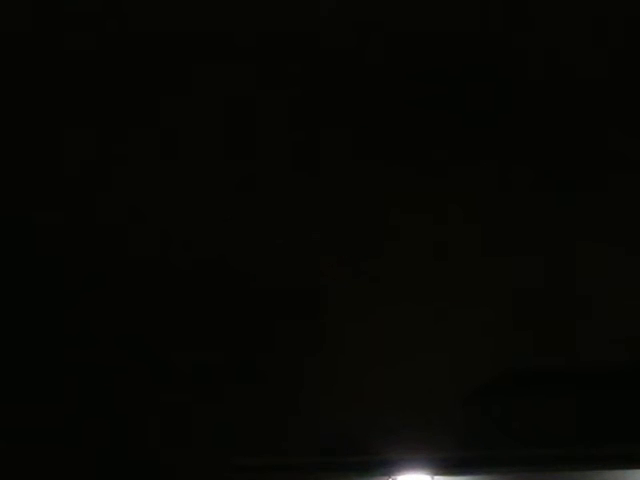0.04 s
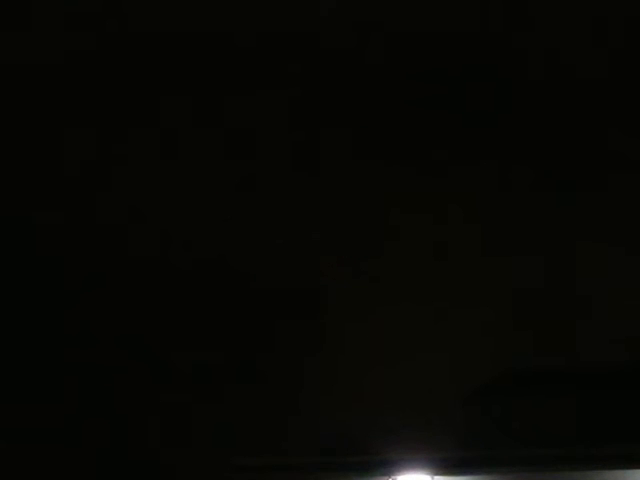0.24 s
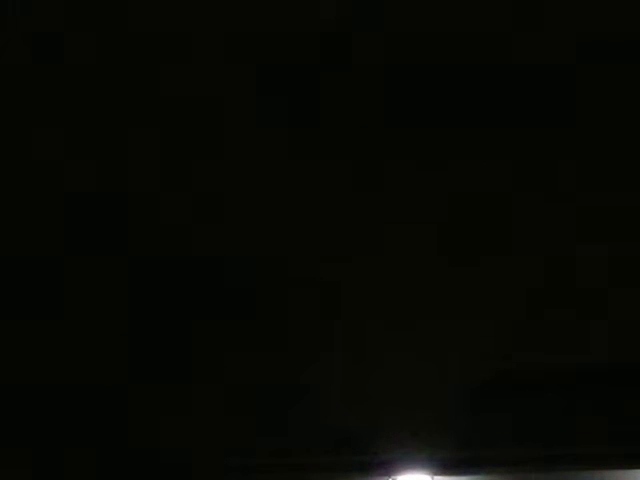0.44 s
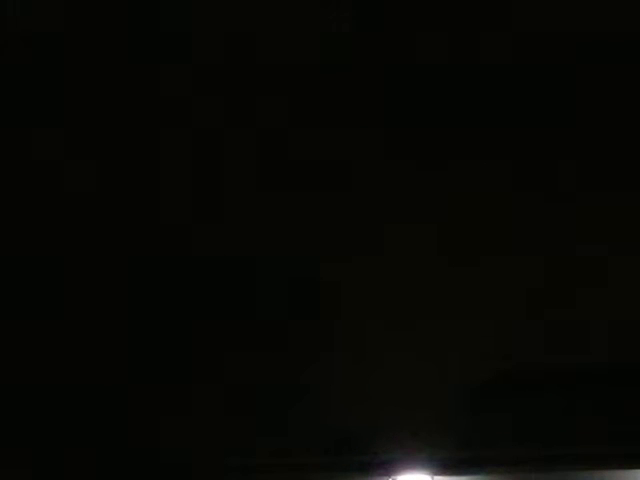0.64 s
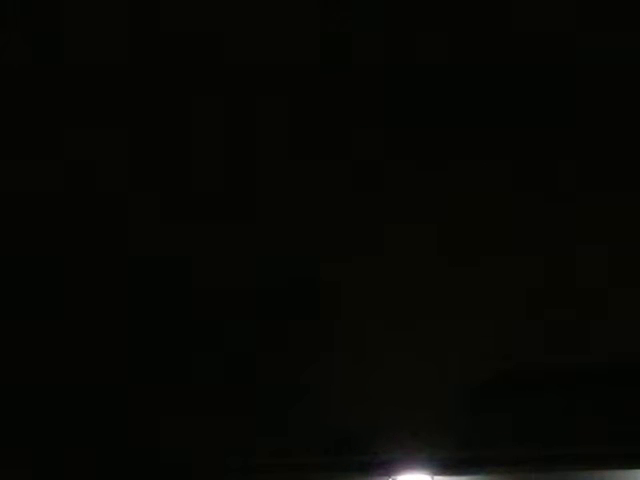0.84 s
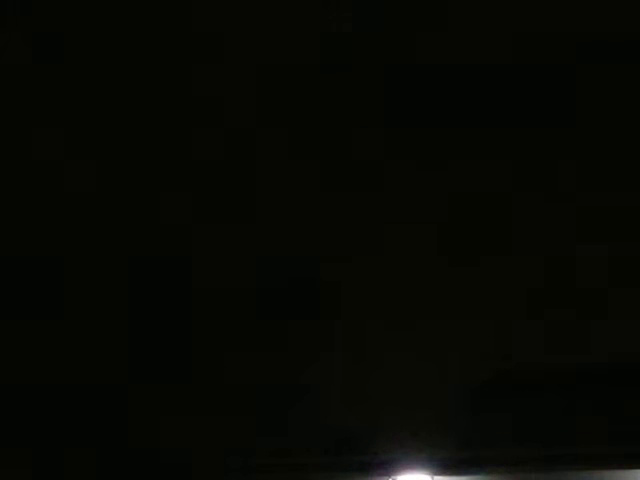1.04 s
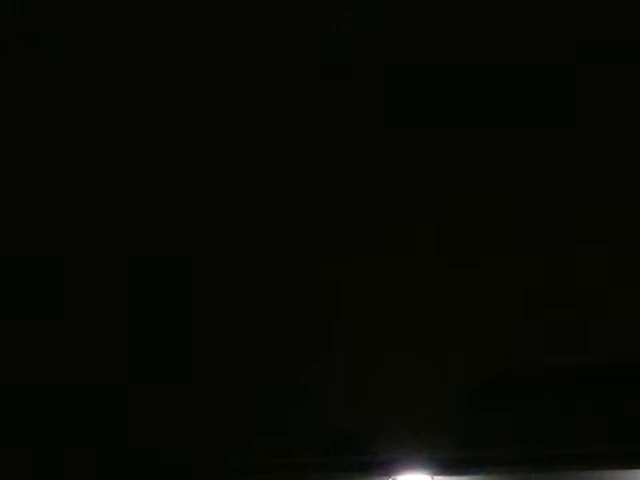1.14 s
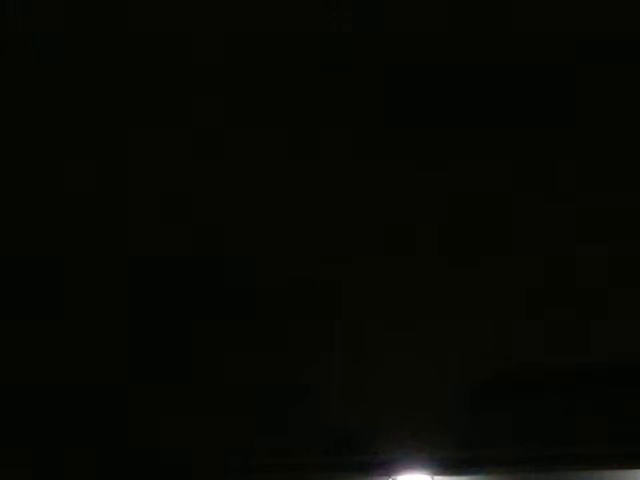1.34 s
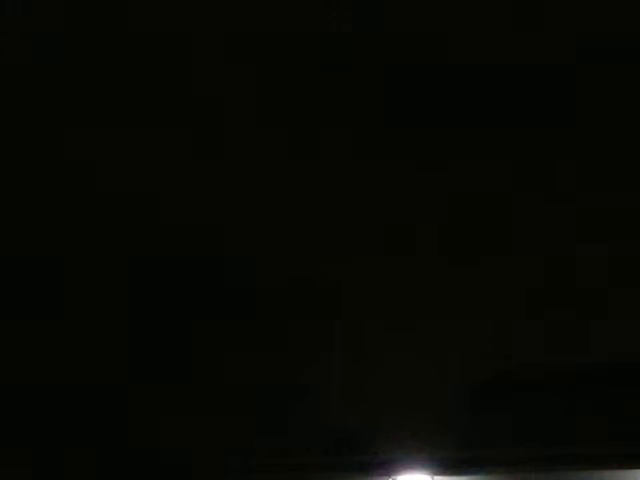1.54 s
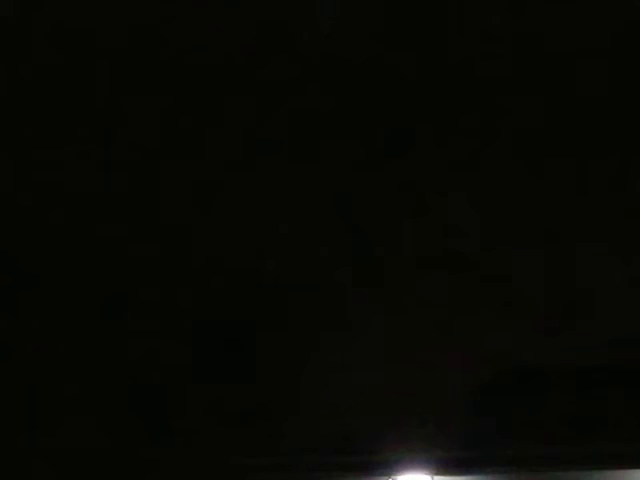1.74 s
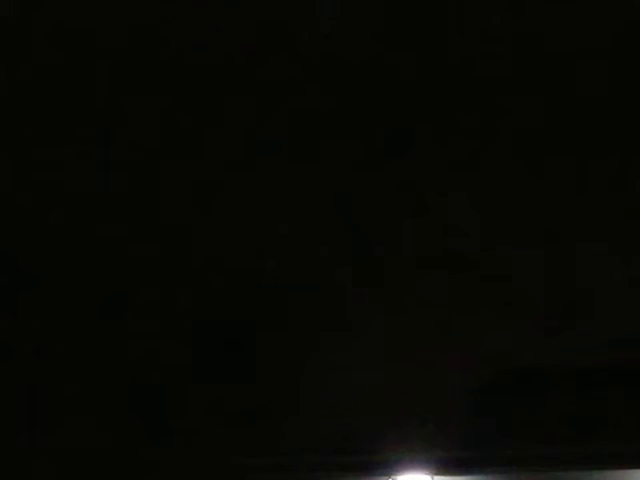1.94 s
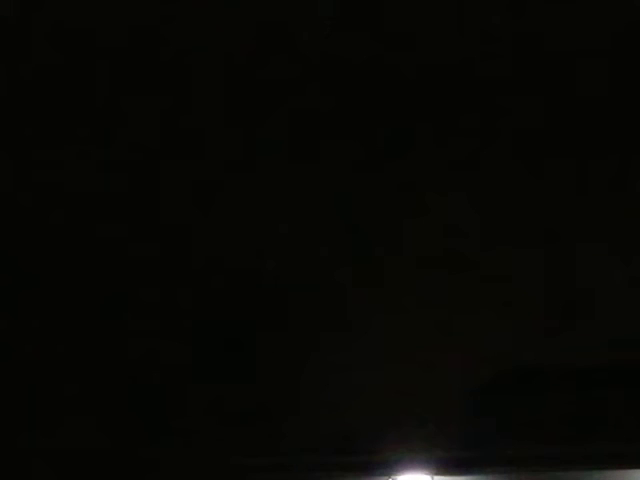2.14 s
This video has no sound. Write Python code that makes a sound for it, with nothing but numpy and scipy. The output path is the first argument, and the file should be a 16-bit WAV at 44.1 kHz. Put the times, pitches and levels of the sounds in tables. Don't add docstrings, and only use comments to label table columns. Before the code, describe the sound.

One loud, overloading firework bang outdoors, with smeared building echoes, a fading rumble and faint distant pops

```python
import sys
import numpy as np
from scipy import signal
from scipy.fft import rfft, irfft, next_fast_len
from scipy.io import wavfile
from scipy.ndimage import map_coordinates

SR = 44100
rng = np.random.default_rng(int(sys.argv[2]) if len(sys.argv) > 2 else 0)


def inscribe(sig):
    pcm = np.round(np.clip(np.atleast_2d(sig).T, -1, 1) * 32767)
    wavfile.write(sys.argv[1], SR, pcm.astype(np.int16))


def ratio_of_db(decibels):
    return 10 ** (np.asarray(decibels, float) / 20)


N = 97020
T = np.arange(N) / SR
BURST_S = 0.22381
AFTER_S = np.clip(T - BURST_S, 0, None)


def unit(x):
    return x / np.sqrt(np.mean(x ** 2) + 1e-20)


def along(points, hz):
    f, v = np.transpose(points)
    return np.interp(np.log(hz + 1), np.log(f + 1), v)


def colour(points):
    return lambda hz: ratio_of_db(along(points, hz))


def filtered(x, response):
    m = next_fast_len(N + SR // 2)
    return irfft(rfft(x, m) * response(np.fft.rfftfreq(m, 1 / SR)), m)[..., :N]


def wobble(knots_per_s):
    knots = rng.standard_normal(int(N * knots_per_s / SR) + 4)
    return map_coordinates(knots, [T * knots_per_s])


def hump(peak_s, rise_s, fall_s):
    d = T - peak_s
    return np.where(d < 0, np.exp(-(d / rise_s) ** 2), np.exp(-np.abs(d) / fall_s))


def onset(build_s):
    return 1 - np.exp(-(AFTER_S / build_s) ** 2)


def noise():
    return rng.standard_normal((2, N))


# f/Hz, correlation/1
LIKENESS = [(60, 0.98), (180, 0.58), (550, 0.8), (1650, 0.77), (4970, 0.58), (15000, 0.13)]


def stereo(pair, gain):
    def mid_side(hz):
        turn = np.arccos(np.clip(along(LIKENESS, hz), -1, 1)) / 2
        return gain(hz) * [np.cos(turn), np.sin(turn)]

    mid, side = filtered(pair, mid_side)
    return unit(np.array([mid + side, mid - side]))


def facets(gain):
    facets_per_s, size_scatter_db = 14000, 0.27
    hit = rng.random((2, N)) < facets_per_s / SR
    return stereo(hit * noise() * ratio_of_db(size_scatter_db * noise()), gain)


def dulled(x, db_per_s, from_s):
    hz, t, z = signal.stft(x, SR, nperseg=256)
    z = z * ratio_of_db(-db_per_s * (hz[:, None] / 3900) ** 2 * np.clip(t - from_s, 0, None))
    return signal.istft(z, SR, nperseg=256)[1][:, :N]


# f/Hz, level/dB per Hz
HISS_COLOUR = [(2350, -35), (4000, -9), (4340, -13), (7750, -2.5), (15800, -3.5)]


def hiss():
    return ratio_of_db(-69.5) * stereo(noise(), colour(HISS_COLOUR))


# f/Hz, level/dB rms
WHINE_TONES = [(7504, -89), (7881, -92)]


def whine():
    return sum(ratio_of_db(db + 3) * np.sin(2 * np.pi * hz * T) for hz, db in WHINE_TONES)


# f/Hz, level/dB per Hz
TOWN_COLOUR = [(15, -52), (25, -12), (75, -0.5), (366, -15), (592, -7), (1150, -5.5), (1290, -9),
               (1620, -11.5), (6000, -36.5), (7800, -36), (13200, -120)]


def town():
    level_db = -51.5 + 0.37 * wobble(7.4)
    return ratio_of_db(level_db) * stereo(noise(), colour(TOWN_COLOUR))


# t/s (peak), level/dB, rise/s, fall/s, f/Hz (pitch)
STROKES = [(2.095, -66, 0.013, 0.037, 7500), (2.11, -59.5, 0.02, 0.023, 4170),
           (2.135, -61.5, 0.04, .03, 3180), (2.165, -66.5, .01, 0.024, 6000)]


def rustle():
    def band(pitch_hz):
        return lambda hz: np.exp(-(np.log(hz / pitch_hz + 1e-9) / 0.39) ** 2)

    return sum(ratio_of_db(db) * hump(s, rise, fall) * stereo(noise(), band(pitch_hz))
               for s, db, rise, fall, pitch_hz in STROKES)


# t/s (peak), level/dB, rise/s, fall/s
WHISTLES = [(.565, -68, .02, .02), (.605, -61, .012, .02), (.63, -62, .008, .006), (.787, -68, .008, .008)]


def railing():
    swell = sum(ratio_of_db(db) * hump(s, rise, fall) for s, db, rise, fall in WHISTLES)
    return swell * np.sin(2 * np.pi * 4120 * T)


# t/s (peak), level/dB, rise/s, fall/s
FAR_POPS = [(1.003, -43, .006, .01), (1.59, -45, .004, .012), (1.613, -42, .003, .005),
            (1.954, -42, .005, .011)]
# f/Hz, level/dB per Hz
POP_COLOUR = [(120, -37), (200, -14), (312, 1), (564, -2.5), (1200, -1.5), (1750, -5.5), (5000, -43),
              (6500, -72), (11000, -120)]


def pops():
    swell = sum(ratio_of_db(db) * hump(s, rise, fall) for s, db, rise, fall in FAR_POPS)
    return swell * facets(colour(POP_COLOUR))


# level/dB at the burst, t60/s
RUMBLE_SLOPES = [
    (-36, 4.7),
    (-41.5, 10.1),
]
# f/Hz, level/dB per Hz
ROLL_COLOUR = [(18, -61), (30, -16), (54, -15), (156, -11.5), (290, 1.5), (565, -4.5), (734, -5.5),
               (1470, -13), (9000, -52), (11700, -74), (19800, -120)]
# f/Hz, level/dB per Hz
LATE_COLOUR = [(18, -42), (30, -23.5), (185, -5.5), (301, -3.5), (448, -12.5), (490, -16.5), (668, -11.5),
               (1140, -13.5), (6000, -34), (7800, -78), (13200, -120)]


def rumble():
    roll = sum(ratio_of_db(db - 60 * AFTER_S / t60_s) * facets(colour(points))
               for (db, t60_s), points in zip(RUMBLE_SLOPES, (ROLL_COLOUR, LATE_COLOUR)))
    uneven_db = 0.23 * wobble(11.6) + 1.6 * wobble(39.94)
    return roll * ratio_of_db(uneven_db) * onset(0.06)


# t/s (peak), level/dB, rise/s, fall/s, steps/Hz
STEPPED_FRONTS = [(1.046, -35, .009, .007, 243), (1.24, -45, .02, .02, 290), (1.264, -37, .008, .008, 290),
                  (1.315, -37, .009, .016, 288)]


def steps():
    def hum(rate_hz):
        train = np.diff(np.floor(T * rate_hz), prepend=0)
        lows_hz = 500
        gain = colour(ROLL_COLOUR)
        return unit(filtered(train, lambda hz: gain(hz) * (hz > rate_hz / 2) / (1 + hz / lows_hz)))

    return sum(ratio_of_db(db) * hump(s, rise, fall) * hum(rate_hz)
               for s, db, rise, fall, rate_hz in STEPPED_FRONTS)


# t/s (peak), level/dB, rise/s, fall/s, boom/0-1
HOUSE_FRONTS = [(0.288, -26, 0.016, 0.025, 1), (0.41, -27.5, 0.0093, .025, 0.8),
                (0.44, -27.5, 0.0045, 0.013, 0.01), (.452, -34, 0.028, 0.012, 0),
                (0.494, -33, 0.041, 0.042, 0.22), (0.621, -37, 0.018, 0.06, 0),
                (.725, -35, 0.0041, 0.0027, 1), (.82, -42, 0.039, 0.035, 0.03),
                (1.044, -35, 0.018, 0.016, 0.3), (1.08, -41, 0.023, 0.045, 0.45),
                (1.202, -41, 0.04, 0.045, 0.01), (1.267, -47.5, 0.011, 0.024, .1),
                (1.316, -44.5, 0.0092, 0.027, 0.3), (1.48, -48, .06, 0.059, 0.16),
                (1.656, -40.5, 0.011, 0.011, 0.74), (1.857, -50, 0.0031, 0.013, 1)]
# f/Hz, level/dB per Hz
CLAP_COLOUR = [(24, -55), (40, -22.5), (262, -1.5), (556, -8.5), (720, -4), (869, -9), (1100, -8),
               (3910, -27), (11000, -58.5), (14300, -92), (22000, -120)]


def house_fronts():
    def boom(hz):
        centre_hz, width_hz = 300, 200
        return (width_hz * hz / np.abs(centre_hz ** 2 - hz ** 2 + 1j * hz * width_hz)) ** 2

    shares = [(ratio_of_db(db) * hump(s, rise, fall), b) for s, db, rise, fall, b in HOUSE_FRONTS]
    claps = sum(h * np.sqrt(1 - b) for h, b in shares) * facets(colour(CLAP_COLOUR))
    booms = sum(h * np.sqrt(b) for h, b in shares) * facets(boom)
    return claps + booms


# f/Hz, level/dB per Hz
NEAR_COLOUR = [(18, -37), (30, -2), (770, -1.5), (1210, -5), (1370, -16), (1910, -9.5), (2790, -19),
               (3550, -19.5), (9000, -44.5), (11700, -81), (19800, -120)]


def near_walls():
    level_db, t60_s = -14, 0.25
    scatter = dulled(facets(colour(NEAR_COLOUR)), db_per_s=46, from_s=BURST_S)
    return ratio_of_db(level_db - 60 * AFTER_S / t60_s) * onset(0.0035) * scatter


# f/Hz, width/Hz, level/dB
RECESSES = [(161.5, 28, -5.5), (397, 33, 1), (582, 68, -6.5), (737, 51, 4.5), (1170, 80, 3), (1340, 80, -2),
            (1450, 51, 6.5), (1854, 62, 4.5), (1970, 41, -2)]


def nooks(hz):
    return ratio_of_db(sum(db / (1 + (2 * (hz - c) / width) ** 2) for c, width, db in RECESSES))


def echoes():
    far = dulled(house_fronts() + rumble(), db_per_s=6.5, from_s=0.26)
    return filtered(near_walls() + far + steps() + pops(), nooks)


# delay/s, left level/dB, right level/dB
GROUND_IMAGES = [(.0028, -12, -7), (.0102, -11, -13)]


def blast():
    peak_db, push_s, rise_hz = 12, 0.00082, 2300
    port_hz, damping = 150, 1.2
    rough_hz = 1100
    u = np.clip((T - BURST_S) / push_s, 0, None)
    wave = ratio_of_db(peak_db) * (u > 0) * (1 - u) * np.exp(-u)

    def response(hz):
        images = sum(ratio_of_db([[left], [right]]) * np.exp(-2j * np.pi * hz * s) for s, left, right in GROUND_IMAGES)
        path = 1 + images / (1 + 1j * hz / rough_hz)
        port = -hz ** 2 / (port_hz ** 2 - hz ** 2 + 2j * damping * port_hz * hz)
        return path * port / (1 + 1j * hz / rise_hz) ** 4

    return filtered(wave, response)


def scene():
    return town() + rustle() + railing() + echoes() + blast()


def overload(x):
    ceiling, knee = 0.995, 12
    return x / (1 + np.abs(x / ceiling) ** knee) ** (1 / knee)


def roll_off(x):
    return signal.sosfilt(signal.butter(12, 16260, fs=SR, output="sos"), x)


def record(dry):
    mix = overload(dry + hiss() + whine())
    return roll_off(mix)


dry = scene()
out = record(dry)
inscribe(out)
```